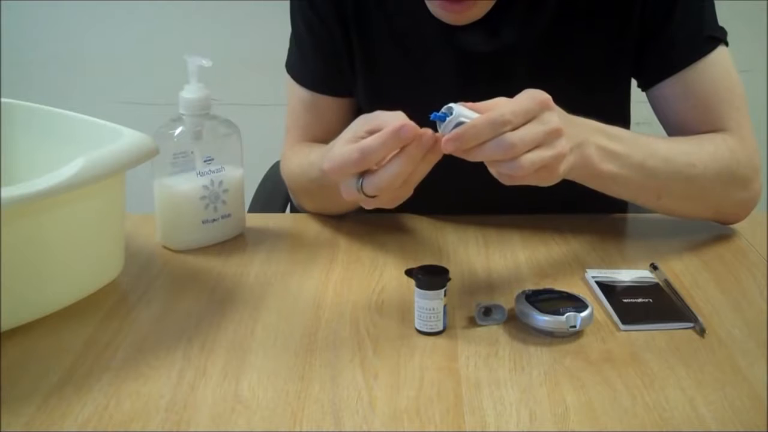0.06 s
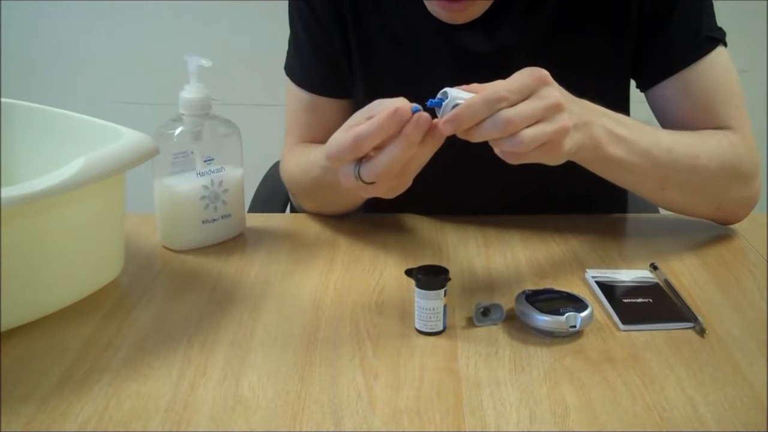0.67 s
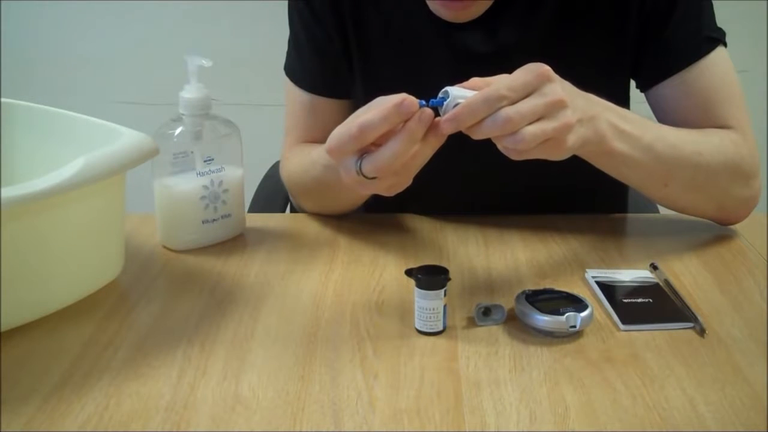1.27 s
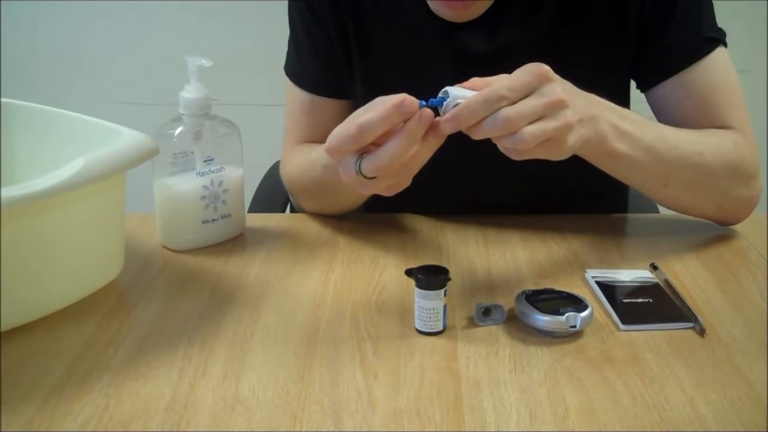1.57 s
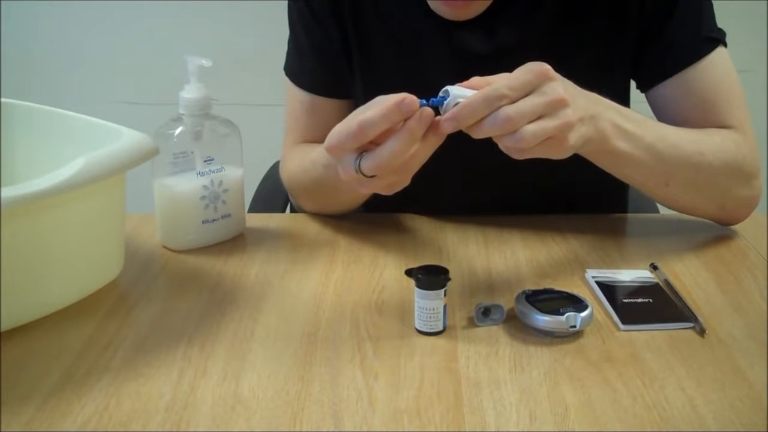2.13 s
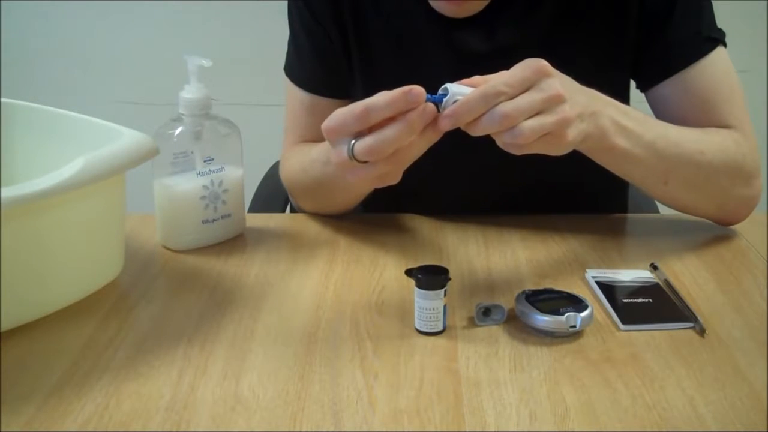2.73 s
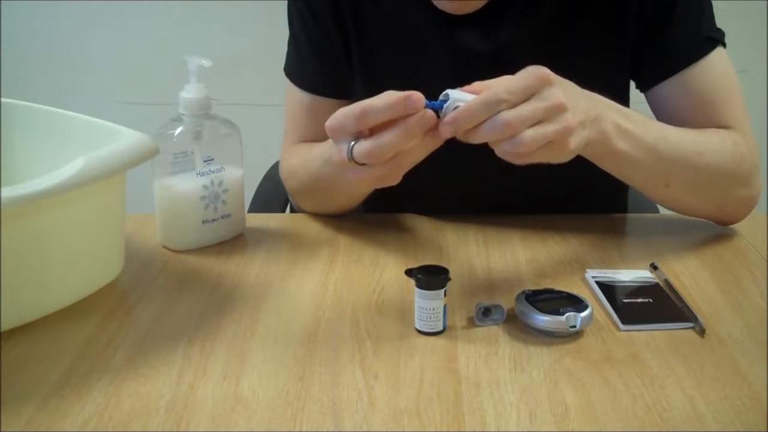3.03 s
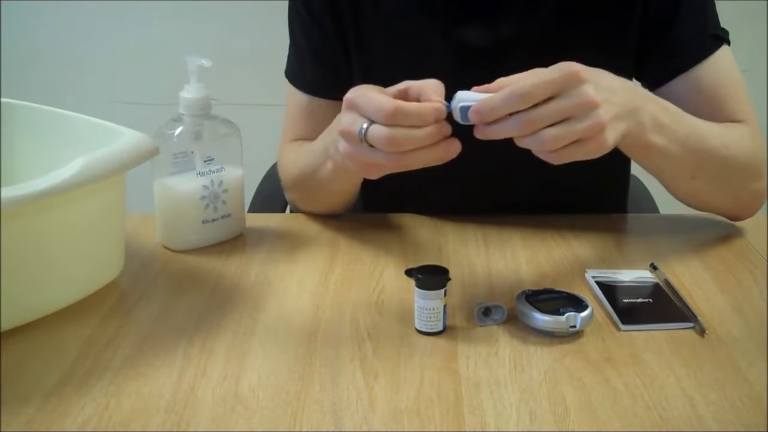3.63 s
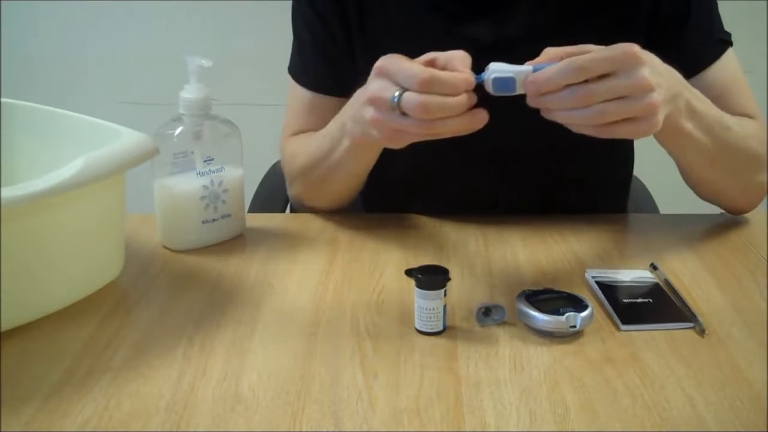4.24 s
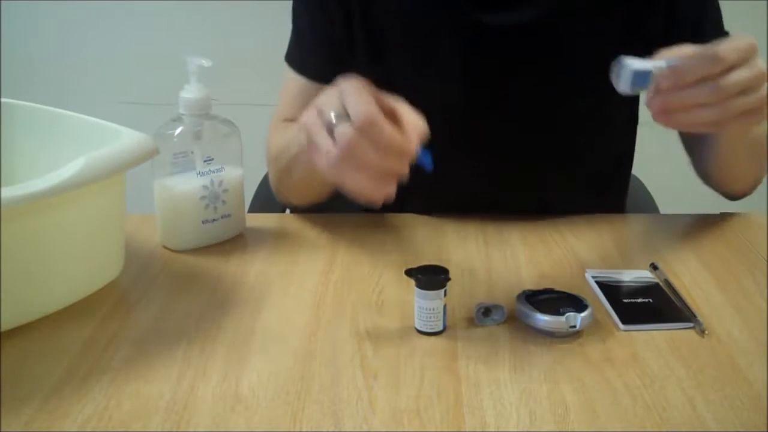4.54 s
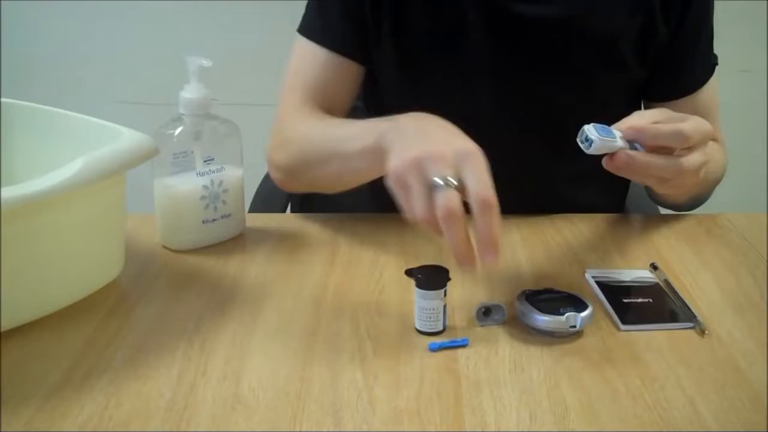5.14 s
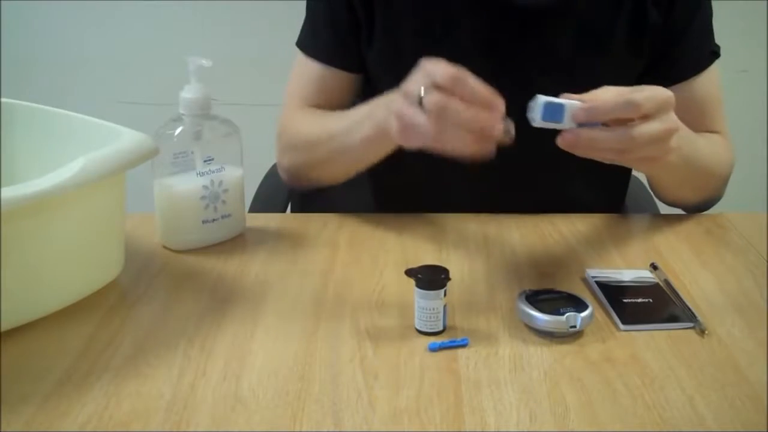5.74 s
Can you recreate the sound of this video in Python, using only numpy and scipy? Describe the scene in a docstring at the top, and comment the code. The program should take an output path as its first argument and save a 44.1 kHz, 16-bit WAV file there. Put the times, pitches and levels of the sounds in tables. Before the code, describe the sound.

A small plastic device clicks and snaps open in the hands, then a tiny plastic piece clatters onto a wooden table in a quiet room.

```python
"""A small quiet room, close to a wooden table; a stereo microphone with two closely spaced ports. Over a low
hum, a plastic finger-pricking device is handled: latches snap and catches tick, ringing its casing. The used
lancet shifts three times, then a faint hiss swells just before a loud click. The lancet comes free with a
sprung snap that overloads the input. A hand knocks on the table, a finger or ring knocks the cap on it, the
lancet clatters onto it, and the cap, nudged and picked up, rubs and judders over the wood."""
import sys
import numpy as np
from scipy import signal
from scipy.fft import rfft, irfft, next_fast_len
from scipy.io import wavfile
from scipy.ndimage import uniform_filter1d

SR = 44100
rng = np.random.default_rng(int(sys.argv[2]) if len(sys.argv) > 2 else 0)


def store_pcm(level_fs):
    """Save levels as 16-bit WAV."""
    pcm = np.round(np.clip(level_fs, -1, 1) * 32767).astype(np.int16)
    wavfile.write(sys.argv[1], SR, np.atleast_2d(pcm).T)


N = 260190
TIME = np.arange(N) / SR

# room tone, rumble to hiss: (frequency [Hz], relative density [dB])
AIR_SPECTRUM = [(15, -43), (25, -19.5), (33, -12.5), (54, -8.5), (127, -5), (170, -15), (210, -4.5),
                (275, -13), (314, -10), (775, -10), (959, -11.5), (4150, -16.5), (7860, -19.5),
                (8740, -19.5), (14500, -23)]
# room tone across the ports: (frequency [Hz], left-right likeness [0-1])
AIR_STEREO = [(30, 0.093), (80, 0.9), (200, .6), (600, 0.11), (2000, 0.055), (12000, 0.044)]
# hums and whines: (frequency [Hz], width [Hz], level [dB])
HUM_TONES = [(70.4, 6, -77), (109.7, 4.3, -81), (132.3, 52, -80.5), (203.3, 9.1, -76.5), (7870, 90, -74.5),
             (11700, 80, -78.5)]
# the low hum swells now and then: (time [s], half length [s], frequency [Hz], level [dB])
HUM_SWELLS = [(0.278, 0.17, 126, -68), (2.368, 0.088, 68, -68), (3.68, 0.34, 203.4, -71.5)]
# latches: (time [s], level [dB], brightness [dB/octave], creep [ms], relative creep level [dB],
# favoured pitch of the creep [Hz])
LATCH_SNAPS = [(1.3274, -18.5, -1, 2.5, 3, 2300), (3.0978, -15, -2.5, 5.2, 1.5, 2680),
               (4.2749, 13, 0.5, 3.9, -8.5, 4300)]
# the casing, damped by the fingers: (frequency [Hz], width [Hz], level [dB])
CASING_MODES = [(1817, 380, -9.5), (2360, 330, -7.5), (2700, 100, -6.5), (3225, 270, -8), (4270, 120, -6.5),
                (4647, 470, -6), (5433, 1800, -8), (6095, 220, -0.5), (6760, 440, -0.5), (7505, 340, -1),
                (8070, 270, -7.5), (10130, 850, -13), (11480, 740, -24), (12890, 1400, -29.5)]
# a catch slips: (time [s], level [dB], brightness [dB/octave], favoured pitch [Hz])
CATCH_TICKS = [(1.6283, -22.5, -3, 1900), (1.954, -29.5, -1.5, 4840), (2.2472, -32.5, -3, 7850),
               (2.9453, -25, -16, 2270), (2.999, -28, -8.5, 7500), (3.2883, -16, -3, 2360),
               (3.3342, -32, -8.5, 2600), (3.5974, -17, -8, 7370), (3.6054, -18.5, 2, 4700),
               (3.6568, -11.5, -2, 6130), (3.6664, -15, 4.5, 4650), (3.815, 8, 0, 7830),
               (3.9213, -15.5, -1.5, 6380), (4.0211, -25, -5.5, 2660), (4.0973, -30.5, -6, 4280),
               (4.5082, -26, -2, 4670), (4.608, -29, -10.5, 2120), (5.657, -21.5, 5, 8200)]
# three shifts of the lancet; in the last row a faint hiss swells just before the loud click:
# (start [s], length [s], level [dB])
CASING_HISSES = [(3.48, 0.055, -67.5), (3.615, .035, -51), (3.672, 0.03, -48), (3.806, 0.0061, -48)]
# the holder's spring: (frequency [Hz], level [dB], t60 [s])
SPRING_MODES = [(2706, -15, .15), (4346, -9, .14), (5362, -17, .23), (5797, -2, .29), (5810, -7, .3),
                (6385, -12, .22), (6884, -8, .2), (7545, -15, .6), (7670, -10, .27), (8510, -20, .32),
                (10290, -26, .26)]
# the hand lands on the table: (time [s], level [dB])
HAND_KNOCKS = [(4.7870, -48.5), (5.3250, -76)]
# the table top: (frequency [Hz], level [dB], t60 [s])
TABLE_MODES = [(150, 1, 0.091), (210, 2, 0.074), (262, -4.5, 0.16), (371, -2.5, 0.13), (440, -7, 0.054),
               (547, -3, 0.068), (640, -15, 0.13), (748, -14, 0.16), (926, -7, 0.097)]
# a finger or ring knocks the cap on the table, with two quick rebounds; then the lancet hits the table: (time
# [s], level [dB], brightness [dB/octave], slip [ms])
WOOD_CONTACTS = [(4.787, -11.5, -1.5, .3), (4.7919, -20.5, -2, 0.69), (4.8020, -21, -8, 2),
                 (4.8846, -11.5, -3, 2.6), (4.9001, -14.5, -5, 1.5), (4.9308, 5, 1, 0.19),
                 (4.9616, -6, -1.5, 2.2), (4.9844, -14.5, -6.5, 2.5), (5.0008, -5, 2, 2.4),
                 (5.0690, -17, -1.5, 4.8), (5.0748, -17.5, 0, 3), (5.097, -25.5, -6, 1.3)]
# the loose parts against the wood: (frequency [Hz], width [Hz], level [dB])
PART_MODES = [(1107, 1500, -15), (1493, 130, -4.5), (1940, 140, -1.5), (2810, 260, 1.5), (3710, 380, -1),
              (4600, 320, -0.5), (5350, 620, -1.5), (5670, 290, 6), (6460, 600, 0.5), (7830, 500, -3.5),
              (8700, 320, -9.5), (9600, 650, -15), (12600, 2400, -31)]
# the cap is pushed and fingered: (start [s], length [s], level [dB])
CAP_PUSHES = [(5.32, .05, -65), (5.374, 0.044, -51), (5.57, 0.036, -67), (5.74, 0.028, -70.5),
              (5.875, .025, -66)]
# reverberation: (frequency [Hz], t60 [s])
REVERB_T60 = [(150, .3), (500, .29), (1400, .25), (3500, .24), (7000, .24), (13000, .24)]
# its colour: (frequency [Hz], gain [dB])
REVERB_COLOUR = [(150, 0.5), (700, 10), (1500, 1.5), (3000, 0), (5500, -5.5), (7500, -1), (10000, -3),
                 (14000, -1)]
# its spread across the ports: (frequency [Hz], left-right likeness [0-1])
REVERB_STEREO = [(150, 0.7), (1000, 0.91), (3000, 0.35), (6000, 0.81), (12000, .3)]
# colour of each microphone port: (frequency [Hz], gain [dB])
LEFT_RESPONSE = [(500, 2), (2000, -1), (4300, -1), (6000, -3), (7000, -0.5), (7700, 4.5), (8500, 7.5),
                 (10000, 4), (14000, 9.5)]
RIGHT_RESPONSE = [(500, 3.5), (2000, -1), (4300, 3.5), (6000, 5.5), (7000, -2.5), (7700, -3), (8500, -5.5),
                  (10000, -7), (14000, 2)]

TICK_SLIP_MS = 1.5   # slip of a tick at 0 dB


def from_db(db):
    """Decibels to gain."""
    return 10 ** (np.asarray(db) / 20)


def unit_energy(x):
    """Scale so that a channel's squares sum to one, on average."""
    return x / np.sqrt(np.mean(np.sum(x ** 2, axis=-1)) + 1e-20)


def at_hz(points, hz):
    """Read a table along a log-frequency axis."""
    points = np.array(points)
    return np.interp(np.log(np.maximum(hz, 1)), np.log(points[:, 0]), points[:, 1])


def add(track, s, sound):
    """Mix a sound in at a time."""
    start = round(s * SR)
    track[start:start + len(sound)] += sound[:N - start]


def passband(x, kind, hz, order=2):
    """Low-pass or high-pass filter."""
    return signal.sosfilt(signal.butter(order, hz, kind, fs=SR, output="sos"), x)


def coloured(x, spectrum):
    """Causal (minimum-phase) filter with the given dB curve."""
    size = next_fast_len(x.shape[-1] + SR // 2, True)
    gain = from_db(at_hz(spectrum, np.fft.rfftfreq(size, 1 / SR)))
    cepstrum = irfft(np.log(gain), size)
    cepstrum[1:size // 2] *= 2
    cepstrum[size // 2 + 1:] = 0
    return irfft(rfft(x, size) * np.exp(rfft(cepstrum)), size)[..., :x.shape[-1]]


def resonance(x, hz, width):
    """Two-pole band-pass, gain one at the top."""
    r = np.exp(-np.pi * width / SR)
    feedback = [1, -2 * r * np.cos(2 * np.pi * hz / SR), r * r]
    return signal.lfilter(np.array([1, 0, -1]) * (1 - r * r) / 2, feedback, x + 1e-18)


def stereo_noise(likeness, size):
    """White noise in two channels that agree as far as the table says."""
    alike = np.clip(at_hz(likeness, np.fft.rfftfreq(size, 1 / SR)), -1, 1)
    mid, side = rfft(rng.standard_normal((2, size)))
    return irfft(np.sqrt(1 + alike) * mid + np.sqrt(1 - alike) * side * [[1], [-1]], size)


def hum(hz, width):
    """A wavering tone of rms one: a narrow band of noise."""
    band = resonance(stereo_noise(AIR_STEREO, N), hz, width)
    return np.sqrt(N) * unit_energy(resonance(band, hz, width))


def room_tone(air_db=-59.75, lean_db=0.98):
    """Rumble and hiss with wavering hums and two faint electronic whines, a little to the left."""
    air = coloured(stereo_noise(AIR_STEREO, N), AIR_SPECTRUM)
    sound = from_db(air_db) * np.sqrt(N) * unit_energy(air)
    for hz, width, db in HUM_TONES:
        sound += from_db(db) * hum(hz, width)
    for s, half_length, hz, db in HUM_SWELLS:
        swell = np.exp(-((TIME - s) / half_length) ** 2)
        sound += from_db(db) * swell * hum(hz, width=10)
    return sound * from_db([[lean_db], [-lean_db]])


def slip(slip_ms, grit, grain_hz=900):
    """Force of one contact: a sharp edge, then dying roughness with no broad colour of its own."""
    t = TIME[:SR // 20]
    roughness = rng.standard_normal(len(t)) * np.exp(-t / (slip_ms / 1000))
    force = grit * slip_ms * unit_energy(roughness)
    force[0] += 1
    hz = np.fft.rfftfreq(len(t), 1 / SR)
    power = uniform_filter1d(abs(rfft(force)) ** 2, max(1, round(grain_hz / hz[1])))
    flattening = np.column_stack([hz, -10 * np.log10(power)])[1:]
    return coloured(force, flattening)


def body(force, modes, low_hz, tilt, favoured_hz, favour_db, reach_octaves=0.072):
    """Modes in parallel; the place of contact favours some, and a small body radiates no bass."""
    sound = 0
    for k, (hz, width, db) in enumerate(modes):
        octaves = np.log2(hz / favoured_hz)
        near = np.exp(-(octaves / reach_octaves) ** 2)
        gain = from_db(db + tilt * octaves + favour_db * near)
        sound = sound + (-1) ** k * gain * resonance(force, hz, width)
    return unit_energy(passband(sound, "high", low_hz))


def with_room_send(sound, room_db):
    """Two rows: the direct sound and the share that feeds the room."""
    return np.array([sound, sound * from_db(room_db)])


def clicks(contacts, modes, low_hz, grit, favour_db, contact_hz, db_per_octave, room_db):
    """Contacts ring a body, harder ones up to a higher pitch."""
    sound = np.zeros(N)
    for s, db, tilt, slip_ms, favoured_hz in contacts:
        top_hz = np.clip(contact_hz * 2 ** (db / db_per_octave), 3000, 18000)
        force = passband(slip(slip_ms, grit), "low", top_hz, order=6)
        add(sound, s, from_db(db) * body(force, modes, low_hz, tilt, favoured_hz, favour_db))
    return with_room_send(sound, room_db)


def latch_snaps():
    """Each latch rings the casing with five quick contacts."""
    contacts = []   # (time [s], level [dB], brightness [dB/octave], slip [ms], favoured pitch [Hz])
    for s, db, tilt, creep_ms, creep_db, creep_hz in LATCH_SNAPS:
        creep_s, creep_tilt = s - creep_ms / 1000, tilt - 1.5
        contacts += [(creep_s - .002, db + creep_db - 15.5, creep_tilt, TICK_SLIP_MS, 4300),   # gives
                     (creep_s, db + creep_db, creep_tilt, creep_ms, creep_hz),   # creeps
                     (s, db, tilt, 1.4, 7320),   # lets go
                     (s + .002, db - .5, tilt, .9, 4300),   # hits its stop
                     (s + .0073, db - 9.5, tilt + 7, 6.2, 6900)]   # rebounds
    return clicks(contacts, CASING_MODES, low_hz=2092, grit=1.1, favour_db=8,
                  contact_hz=13000, db_per_octave=90, room_db=-6)


def catch_ticks(slip_halves_db=50):
    """Catches slip and ring the casing once each; harder ticks are over sooner."""
    contacts = [(s, db, tilt, TICK_SLIP_MS * 2 ** (-db / slip_halves_db), hz)
                for s, db, tilt, hz in CATCH_TICKS]
    return clicks(contacts, CASING_MODES, low_hz=1980, grit=0.94, favour_db=10,
                  contact_hz=14100, db_per_octave=59, room_db=-5.5)


def strokes(rows, attack_s, release_s):
    """Gain of short strokes: each swells, holds and dies away."""
    gain = np.zeros(N)
    for s, length, db in rows:
        before, after = np.maximum(s - TIME, 0), np.maximum(TIME - s - length, 0)
        gain = np.maximum(gain, from_db(db) * np.exp(-before / attack_s - after / release_s))
    return gain


def grainy_hiss(gain, modes, low_hz, high_hz, tilt, squeak_hz, squeak_db, slips_per_s, room_db):
    """Dense, uneven impulses, as when plastic sticks and slips, ring a body and favour one mode."""
    slips = (rng.random(N) < slips_per_s / SR) * rng.standard_normal(N)
    force = passband(slips, "low", high_hz)
    sound = np.sqrt(N) * body(force, modes, low_hz, tilt, squeak_hz, squeak_db) * gain
    return with_room_send(sound, room_db)


def casing_hisses():
    """Three shifts of the lancet sound the casing; then a faint hiss swells just before the loud click."""
    gain = strokes(CASING_HISSES, attack_s=0.013, release_s=0.03)
    return grainy_hiss(gain, CASING_MODES, low_hz=1700, high_hz=8000, tilt=-.5,
                       squeak_hz=6100, squeak_db=0.5, slips_per_s=1300, room_db=0.5)


def ringing(blows, modes, low_hz, room_db):
    """Long-lived modes, struck a little differently by each blow."""
    sound, t = np.zeros(N), TIME[:SR]
    for s, blow_db in blows:
        for k, (hz, db, t60) in enumerate(modes):
            gain = from_db(blow_db + db + rng.normal(0, 1))
            fade = 10 ** (-3 * t / t60)
            add(sound, s, (-1) ** k * gain * fade * np.sin(2 * np.pi * hz * t))
    return with_room_send(passband(sound, "high", low_hz), room_db)


def holder_spring(blow_db=-27.5):
    """The last snap frees the holder's spring, which rings on."""
    freed_s = LATCH_SNAPS[-1][0]
    return ringing([(freed_s, blow_db)], SPRING_MODES, low_hz=300, room_db=-14.5)


def hand_knocks():
    """The hand lands and rings the low modes of the table top."""
    return ringing(HAND_KNOCKS, TABLE_MODES, low_hz=129, room_db=-2.5)


def table_clatter(favoured_hz=6200):
    """A finger or ring knocks the cap on the wood, then the lancet drops and bounces on it; every contact
    favours the same pitch."""
    contacts = [(s, db, tilt, slip_ms, favoured_hz) for s, db, tilt, slip_ms in WOOD_CONTACTS]
    return clicks(contacts, PART_MODES, low_hz=900, grit=1, favour_db=0.5,
                  contact_hz=11300, db_per_octave=124, room_db=-6.5)


def cap_pushes():
    """The cap rubs with a thin squeak as it is pushed over the wood and fingered."""
    gain = strokes(CAP_PUSHES, attack_s=0.0038, release_s=0.0086)
    return grainy_hiss(gain, PART_MODES, low_hz=700, high_hz=11100, tilt=-5.5,
                       squeak_hz=8020, squeak_db=15.5, slips_per_s=1700, room_db=-11)


def cap_judder(start_s=5.3714, step_s=.0182, db=-24, slip_ms=2.7, favoured_hz=3600):
    """The nudged cap catches on the wood in four even steps, duller at each."""
    tilt, dulling = 3.3, 8.2   # dB per octave: at first, and lost per step
    contacts = [(start_s + k * step_s, db, tilt - k * dulling, slip_ms, favoured_hz) for k in range(4)]
    return clicks(contacts, PART_MODES, low_hz=990, grit=0.6, favour_db=4,
                  contact_hz=11000, db_per_octave=124, room_db=-0.5)


def room(x, first_echo_s=0.0018, build_s=0.0012, near_db=-2.5, near_fade_s=0.0072):
    """Table and chest send back a quick cluster of echoes; the walls' tail dies away band by band."""
    t = TIME[:SR * 2 // 3]
    noise = rfft(stereo_noise(REVERB_STEREO, len(t)))
    hz = np.fft.rfftfreq(len(t), 1 / SR)
    edges = np.geomspace(60, 16000, 25)
    onset = np.clip((t - first_echo_s) / build_s, 0, 1)
    near_echoes = 1 + from_db(near_db) * np.exp(-t / near_fade_s)
    tail = 0
    for low, high in zip(edges, edges[1:]):
        fade = 10 ** (-3 * t / at_hz(REVERB_T60, np.sqrt(low * high)))
        band = irfft(noise * ((hz >= low) & (hz < high)), len(t))
        tail = tail + np.sqrt(high - low) * unit_energy(band * fade * onset * near_echoes)
    response = coloured(unit_energy(tail), REVERB_COLOUR)
    return signal.fftconvolve(x[None], response, axes=1)[:, :N]


def at_ports(x, lean_db):
    """Direct sound at the microphone: the left port gets it louder and a sample later."""
    return np.array([np.roll(x, 1), x]) * from_db([[lean_db], [-lean_db]])


def scene():
    """Device, table and room, heard through two closely spaced ports."""
    device, device_send = catch_ticks() + latch_snaps() + holder_spring() + casing_hisses()
    table, table_send = table_clatter() + cap_judder() + hand_knocks() + cap_pushes()
    direct = at_ports(device, lean_db=1.7) + at_ports(table, lean_db=0.5)
    left, right = direct + room(device_send + table_send)
    return np.array([coloured(left, LEFT_RESPONSE), coloured(right, RIGHT_RESPONSE)]) + room_tone()


def record(dry):
    """The loudest snap overloads the input, a little earlier on its upward swings; the top is cut."""
    overloaded = np.clip(dry, -.97, .87)
    cutoff_hz = 14700
    return signal.sosfilt(signal.ellip(10, .2, 70, cutoff_hz, fs=SR, output="sos"), overloaded)


dry = scene()
out = record(dry)
store_pcm(out)
```